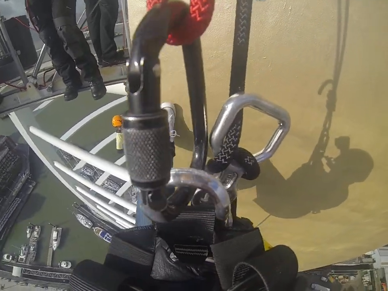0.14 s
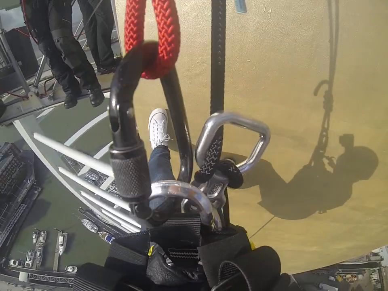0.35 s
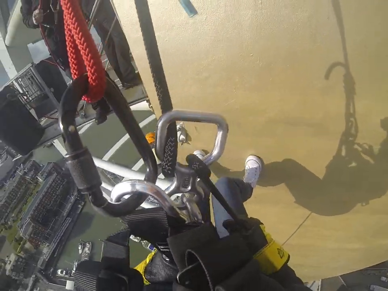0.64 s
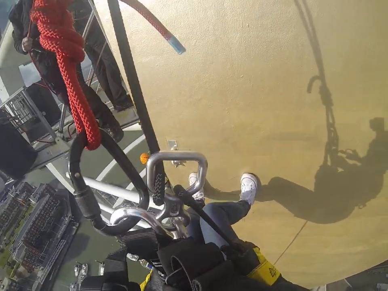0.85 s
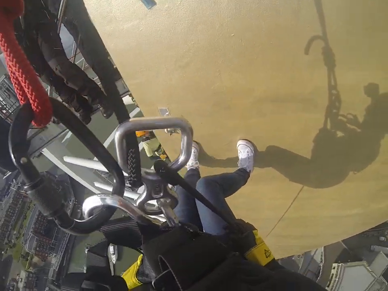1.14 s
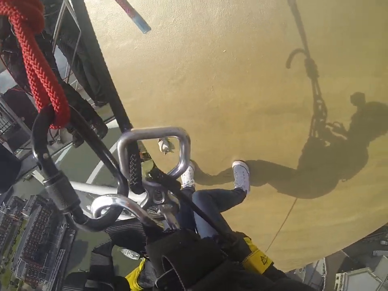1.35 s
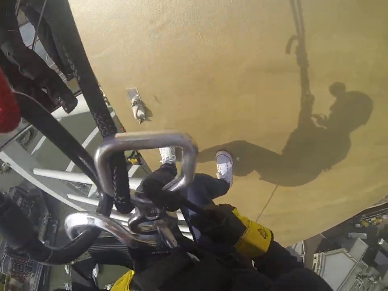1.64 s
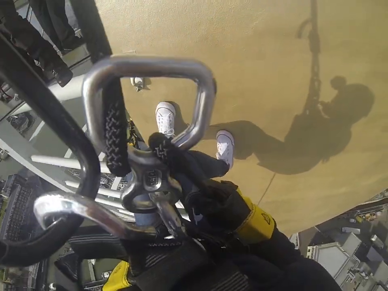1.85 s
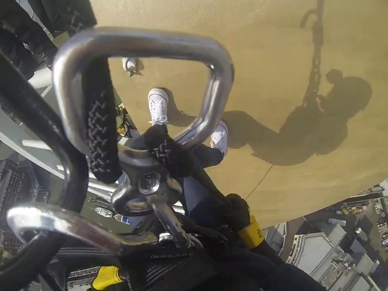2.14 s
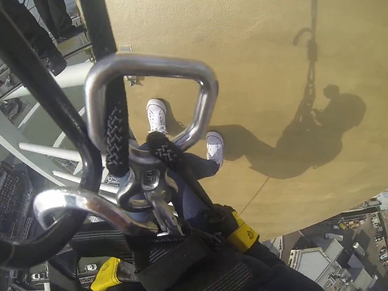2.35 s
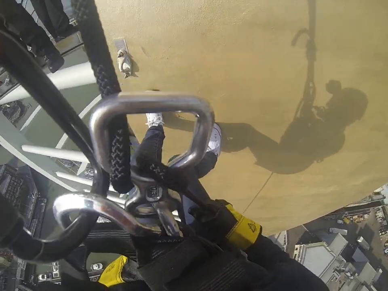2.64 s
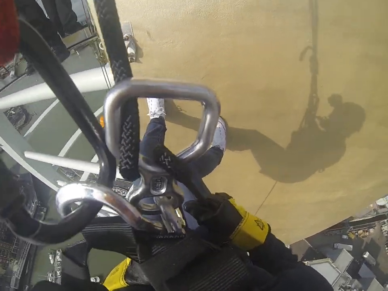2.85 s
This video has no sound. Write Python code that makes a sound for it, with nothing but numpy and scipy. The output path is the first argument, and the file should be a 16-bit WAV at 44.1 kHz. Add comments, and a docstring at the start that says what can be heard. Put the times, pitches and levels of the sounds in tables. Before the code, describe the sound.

Metal carabiners clack and clink irregularly over a low rumble of wind.

```python
"""Carabiners clack over a rumble of wind: abseiling down a tower, heard from a camera on the chest.
Each shift of the loaded metal excites modes that the rope damps, and thumps through the harness into
the housing. Hardware bumps the shell, webbing rubs, and at the end sliding metal scrapes and jangles.
Gusts buffet the microphone; behind them lie the distant city and a faint whine of electronics."""
import sys
import numpy as np
from scipy import signal
from scipy.fft import rfft, irfft, next_fast_len
from scipy.io import wavfile
from scipy.ndimage import uniform_filter1d

SR = 44100
rng = np.random.default_rng(int(sys.argv[2]) if len(sys.argv) > 2 else 0)


def materialize(psi):
    """Save the field psi as 16-bit PCM at rate SR to the path in sys.argv[1].

    A 1-D psi becomes a single channel; in a 2-D psi each row is a channel.
    """
    bounded = np.clip(np.atleast_2d(psi).T, -1, 1)
    quanta = np.round(bounded * 32767).astype(np.int16)
    wavfile.write(sys.argv[1], SR, quanta)


N = 132300
T = np.arange(N) / SR


def clacks():
    """Impact excitation: each shift gives a snap, a knock and damped modes of metal and housing."""
    # shifts under load: (time [s], ring [dB], brightness [dB/octave], knock [dB], thump [dB])
    shifts = [(0.1633, -23, 1, -34.5, -30), (0.3376, -29.5, 1, -33.5, -33), (0.436, -38, -6, -37, -38),
              (0.446, -47, -8, -47, -47), (0.451, -49, 11, -60, -50), (0.466, -44, 1, -37, -32.5),
              (0.57, -43.5, 3, -44.5, -53), (0.807, -37.5, 0.5, -45.5, -43),
              (0.842, -58, -20, -45.5, -41.5), (0.901, -38, 4.5, -37, -43), (1.0003, -21, 4, -36, -26.5),
              (1.3643, -26, 0.5, -34.5, -31.5), (1.424, -31.5, 0.5, -32.5, -35.5),
              (1.5819, -17, 2.5, -32.5, -23), (1.825, -47, 16, -68, -51), (1.964, -56, -13, -45.5, -41.5),
              (2.035, -59, -25, -45.5, -39), (2.091, -40.5, -6, -45, -39), (2.159, -46, 3, -41, -48.5),
              (2.29, -52.5, -18, -46.5, -39), (2.345, -43, -1, -39.5, -38), (2.491, -27, 3.5, -32, -36),
              (2.542, -56, -19, -45.5, -40.5)]
    # modes of carabiners and camera housing: (frequency [Hz], level [dB], T60 [s])
    metal_modes = [(824, -23, 0.036), (1053, -8, .027), (1565.3, -3.5, 0.028), (1650.5, -10.5, 0.031),
                   (2076, -17.5, 0.021), (2420, -11, 0.016), (2735, -19.5, 0.02), (3335, -33, 0.026),
                   (3670, -23.5, 0.015)]
    housing_modes = [(111.7, 1.5, 0.084), (160, 3.5, 0.058), (268, -9.5, 0.03), (436, -20, 0.065)]
    # spectra of the dull knock and the dry snap at first contact: (frequency [Hz], level [dB])
    knock_spectrum = [(100, -7), (260, -0.5), (550, -7.5), (1000, 1.5), (1700, -2.5), (2200, -14),
                      (3300, -17.5), (4500, -37.5), (9000, -37)]
    snap_spectrum = [(800, -9.5), (2700, 9.5), (3700, -1.5), (4300, -5.5), (5200, -5.5), (7500, -17.5),
                     (12000, -34)]
    pivot_hz, swell_s, detune, spread_db = 1626, 0.00213, 0.005, 1.5
    pulse_db, rattle_db, rattle_t60_s = 11.5, -0.5, 0.049
    snap_db, snap_hz, snap_t60_s = -16.5, 4100, 0.016
    choke = 1.37  # decay exponent: the rope grips harder as the ring goes on
    rings, knocks, snaps = np.zeros((3, N))
    t = T[:SR // 6]
    hz, db, t60 = np.transpose(metal_modes)[:, :, None]
    swell = 1 - np.exp(-(t / swell_s) ** 2)  # the parts seat
    thump = swell * damped_modes(housing_modes, t)
    for start, ring_db, tilt_db, knock_db, thump_db in shifts:
        strength, tuning = rng.standard_normal((2, len(hz), 1))
        rattle, snap = rng.standard_normal((2, len(t)))
        mode_db = ring_db + db + tilt_db * np.log2(hz / pivot_hz) + spread_db * strength
        envelopes = from_db(mode_db - 60 * (t / t60) ** choke)
        modes = envelopes * np.sin(2 * np.pi * hz * (1 + detune * tuning) * t)
        add(rings, start, 2 * swell * modes.sum(0) + from_db(thump_db) * thump)
        rattle *= from_db(rattle_db - 60 * t / rattle_t60_s)
        add(knocks, start, from_db(knock_db) * (from_db(pulse_db) * (t == 0) + rattle))
        onset_db = ring_db + snap_db + tilt_db * np.log2(snap_hz / pivot_hz)
        add(snaps, start, from_db(onset_db - 60 * t / snap_t60_s) * snap)
    return rings + colour(knocks + scuffs(), knock_spectrum) + colour(snaps, snap_spectrum)


def bumps():
    """Impulse response: blunt blows ring the camera's shell with a woody knock."""
    # hardware striking the camera: (time [s], level [dB])
    blows = [(0.1125, -18), (.3049, -26.5), (1.111, -25.5)]
    # modes of the shell: (frequency [Hz], level [dB], T60 [s])
    shell_modes = [(138, -2, 0.05), (274, -4.5, 0.0206), (410, -17.5, 0.071), (515, -10, 0.029),
                   (1020, -1.5, 0.015), (1600, -7.5, 0.027), (2820, -12.5, 0.0085)]
    out = np.zeros(N)
    ring = damped_modes(shell_modes, T[:SR // 6])
    for start, db in blows:
        add(out, start, from_db(db) * ring)
    return signal.sosfilt(signal.butter(3, 3800, fs=SR, output="sos"), out + 1e-18)


def slide():
    """Stick-slip friction: sliding metal catches at random, scraping and keeping close modes jangling."""
    # force of the scrape: (time [s], level [dB])
    force_curve = [(2.761, -47), (2.766, -36), (2.779, -38.5), (2.795, -46.5), (2.82, -41), (2.838, -39.5),
                   (2.853, -48.5), (2.875, -45.5), (2.91, -51.5), (2.937, -47.5), (2.96, -56.5), (3.0, -56)]
    # spectrum of the scrape and modes of the hardware: (frequency [Hz], level [dB])
    scrape_spectrum = [(300, -25), (700, -19), (1200, -5), (1600, 3.5), (1950, -6.5), (2300, 3),
                       (2650, -12), (3800, -18.5), (4300, -31), (5000, -20.5), (5700, -37), (12000, -65)]
    jangle_modes = [(1466, 6), (1510, 5), (1600, 1), (1655, 8), (1696, 12), (2130, -4), (2360, -4),
                    (2830, -2)]
    catches_per_s, jangle_t60_s, jangle_db, scrape_db = 460, 0.23, -2.5, 2
    force = from_db(in_time(force_curve)[0]) * (T > force_curve[0][0])
    catches = rms_one((rng.random(N) < catches_per_s / SR) * rng.standard_normal(N))
    t = T[:SR // 2]
    ring = sum((-1) ** k * damped_modes([(hz, db, jangle_t60_s)], t)
               for k, (hz, db) in enumerate(jangle_modes))
    jangle = evened(signal.fftconvolve(catches, ring)[:N], size=2000)
    grit = rms_one(colour(catches + 2.2 * rng.standard_normal(N), scrape_spectrum))
    return force * (from_db(jangle_db) * jangle + from_db(scrape_db) * grit)


def webbing():
    """Friction noise: a strap drags over the housing in short, dull rubs."""
    # strokes of the strap: (time [s], duration [s], level [dB])
    rubs = [(0.486, 0.148, -49), (0.635, 0.034, -38), (1.112, 0.043, -35.5)]
    # spectrum of the rubbing: (frequency [Hz], level [dB])
    rub_spectrum = [(80, -4.5), (170, 7.5), (225, -8.5), (275, 0), (345, -15.5), (520, -15.5), (750, -23),
                    (1600, -19), (3300, -35.5), (9000, -78)]
    edge_s = 0.0064
    force = sum(from_db(db) * np.clip(np.minimum(T - start, start + length - T) / edge_s, 0, 1)
                for start, length, db in rubs)
    return force * evened(noise(rub_spectrum), size=900)


def scuffs():
    """A Poisson process of faint, soft contacts, each a decaying burst of noise."""
    scuffs_per_s, scuff_db, t60_s = 19, -43.5, 0.013
    contacts = (rng.random(N) < scuffs_per_s / SR) * rng.random(N)
    force = signal.lfilter([1], [1, -from_db(-60 / (t60_s * SR))], contacts + 1e-18)
    return from_db(scuff_db) * force * rng.standard_normal(N)


def wind():
    """Turbulence and cavity resonance: gusts buffet the microphone and boom in the hollow housing."""
    # strength of the gusts: (time [s], buffeting [dB], boom [dB])
    gusts = [(0, -35, -43.5), (.15, -43, -42), (.27, -37, -57.5), (.38, -42.5, -40), (.48, -35.5, -42),
             (.54, -29, -34), (.64, -27.5, -43.5), (.77, -42.5, -46.5), (.95, -35.5, -46),
             (1.08, -43.5, -46), (1.21, -29.5, -45), (1.33, -43.5, -55.5), (1.4, -35, -38),
             (1.52, -36.5, -50.5), (1.63, -32.5, -39.5), (1.79, -49.5, -58.5), (2.01, -31, -44),
             (2.17, -41.5, -52.5), (2.42, -35.5, -52), (2.65, -34, -37), (2.85, -37.5, -46), (3, -35, -59)]
    # spectra of the buffeting and the boom: (frequency [Hz], level [dB])
    buffet_spectrum = [(5, -15), (11, 4.5), (16, 2), (26, -6), (38, -9.5), (56, -21), (80, -25.5),
                       (2000, -130)]
    boom_spectrum = [(50, -26.5), (80, -4.5), (100, 4.5), (118, 0), (140, -14), (180, -18), (240, -24.5),
                     (4000, -92)]
    buffet_db, boom_db = in_time(gusts)
    buffet = from_db(buffet_db + 1) * evened(noise(buffet_spectrum), size=5000)
    boom = from_db(boom_db + 0.5) * evened(noise(boom_spectrum), size=3500)
    return buffet + boom


def city_air():
    """Sound transmission: the housing filters the steady noise of air and distant city."""
    # spectrum inside the housing: (frequency [Hz], level [dB])
    air_spectrum = [(150, 4), (400, 0), (650, -5), (1300, 1.5), (1560, 9.5), (1900, -7), (2400, -2.5),
                    (3000, -12.5), (4200, -17), (6500, -20.5), (10000, -25), (13300, -22), (15000, -23)]
    return from_db(-57) * noise(air_spectrum)


def whine():
    """Pulse modulation: a thin electronic tone and its octave switch on and off at a steady rate."""
    # partials of the whine: (frequency [Hz], level [dB])
    partials = [(6461, -71), (12922, -65.5)]
    pulse_hz, start_s, duty, wander_cycles = 47.95, 0.0043, 0.41, 0.257
    cycle = (T - start_s) * pulse_hz
    # the phase takes one random step per pulse
    slip = wander_cycles * np.cumsum(rng.standard_normal(N))[cycle.astype(int)]
    tones = sum(from_db(db) * np.sin(2 * np.pi * (hz * T + slip)) for hz, db in partials)
    gate = uniform_filter1d((cycle % 1 < duty) * 1., size=30)
    return gate * tones


def damped_modes(modes, t):
    """Free vibration: a sum of exponentially decaying sinusoids."""
    return sum(from_db(db - 60 * t / t60) * np.sin(2 * np.pi * hz * t) for hz, db, t60 in modes)


def colour(x, spectrum):
    """Minimum-phase filter of unit power gain, shaped by (frequency [Hz], level [dB]) points."""
    size = next_fast_len(2 * N)
    hz, db = np.transpose(spectrum)
    log_hz = np.log(np.fft.rfftfreq(size, 1 / SR) + 1)
    gain = rms_one(from_db(np.interp(log_hz, np.log(hz), db)))
    cepstrum = irfft(np.log(gain), size)
    cepstrum[1:size // 2] *= 2  # folding the cepstrum makes the filter causal
    cepstrum[size // 2 + 1:] = 0
    return irfft(rfft(x, size) * np.exp(rfft(cepstrum)), size)[:N]


def noise(spectrum):
    """Filtered Gaussian noise of unit rms."""
    return rms_one(colour(rng.standard_normal(N), spectrum))


def evened(x, size):
    """Division by the running rms over size samples evens out chance swells."""
    return x / np.sqrt(uniform_filter1d(x ** 2, size) + 1e-9)


def from_db(db):
    """Decibels to amplitude ratio."""
    return 10 ** (np.asarray(db) / 20)


def rms_one(x):
    """Normalisation to unit rms."""
    return x / np.sqrt(np.mean(x ** 2) + 1e-20)


def in_time(rows):
    """Linear interpolation of each column of a curve at every sample."""
    times, *columns = np.transpose(rows)
    return [np.interp(T, times, column) for column in columns]


def add(out, start_s, x):
    """Superposition of x on out, from start_s on."""
    i = int(start_s * SR)
    out[i:i + len(x)] += x[:N - i]


def scene():
    """Superposition of all sources at one microphone."""
    return (clacks() + bumps() + webbing() + slide() + wind() + city_air() + whine())[None]


def record(dry):
    """Band limiting: the deepest rumble is rolled off and the top is cut steeply."""
    low_cut_hz, high_cut_hz = 6, 14650
    x = signal.sosfilt(signal.butter(2, low_cut_hz, "high", fs=SR, output="sos"), dry)
    return signal.sosfilt(signal.ellip(10, .1, 80, high_cut_hz, fs=SR, output="sos"), x)


dry = scene()
out = record(dry)
materialize(out)
```